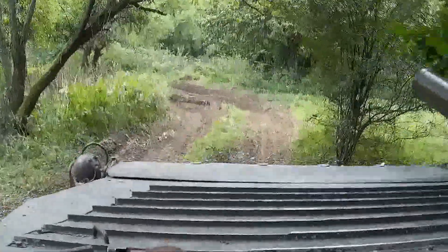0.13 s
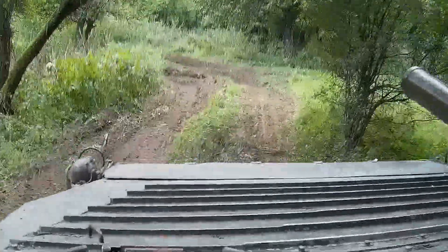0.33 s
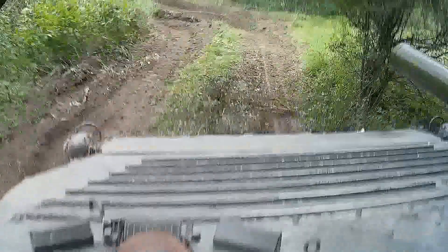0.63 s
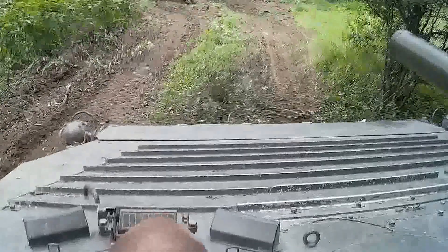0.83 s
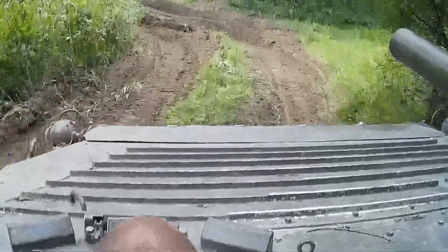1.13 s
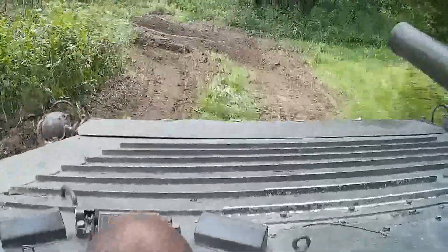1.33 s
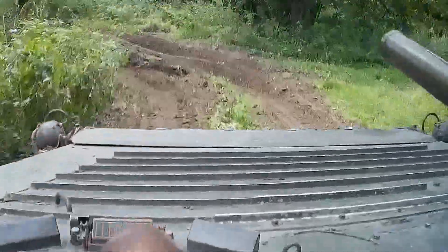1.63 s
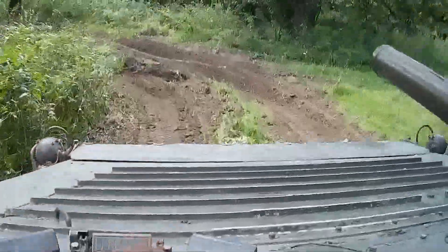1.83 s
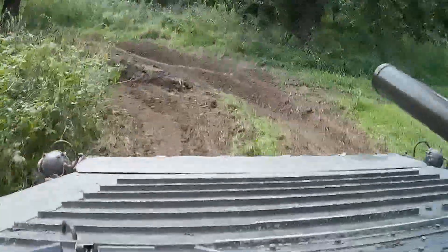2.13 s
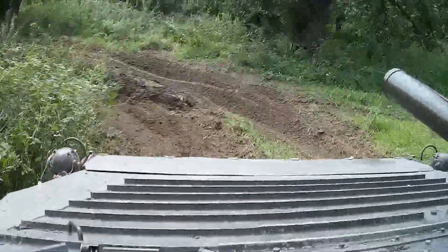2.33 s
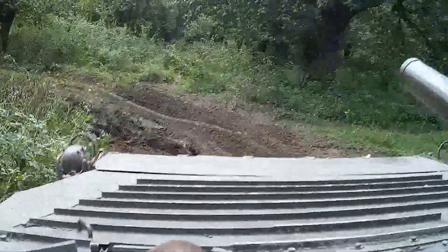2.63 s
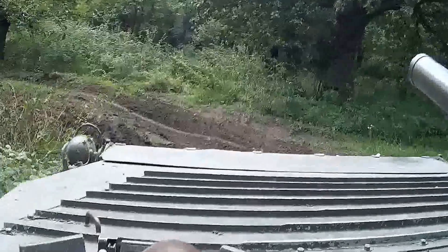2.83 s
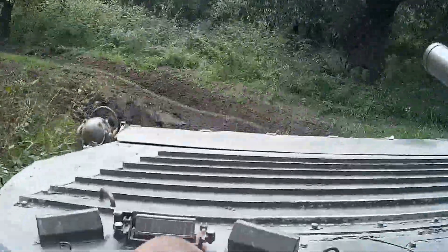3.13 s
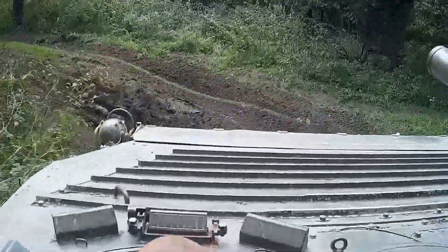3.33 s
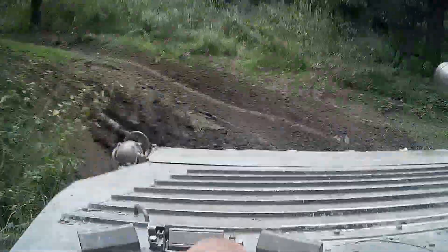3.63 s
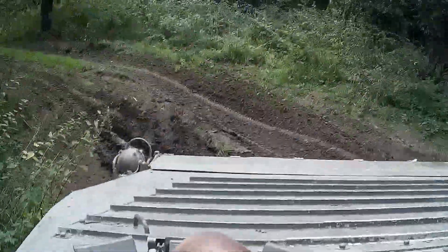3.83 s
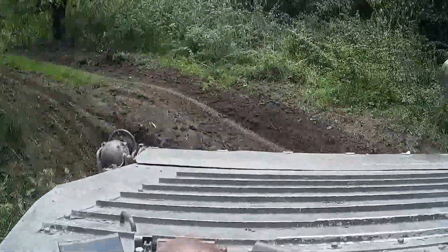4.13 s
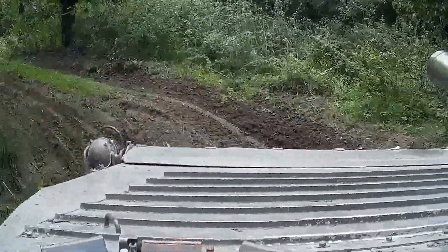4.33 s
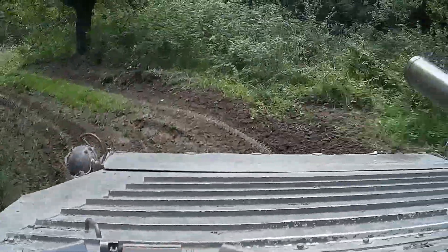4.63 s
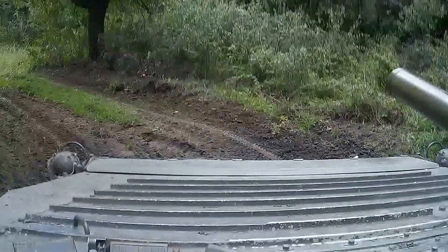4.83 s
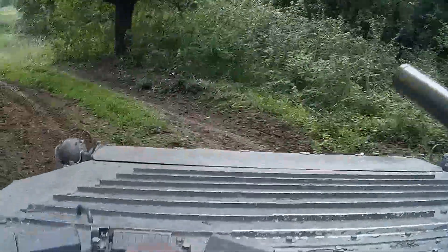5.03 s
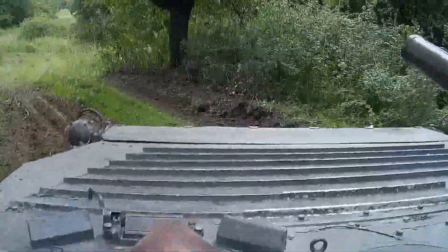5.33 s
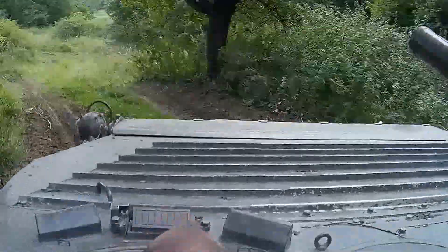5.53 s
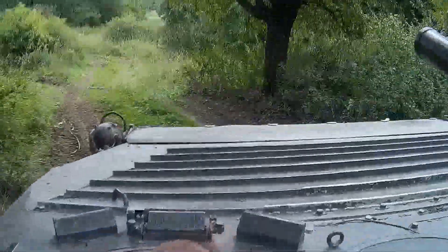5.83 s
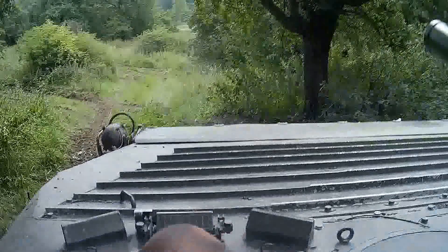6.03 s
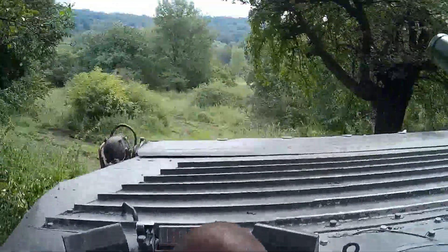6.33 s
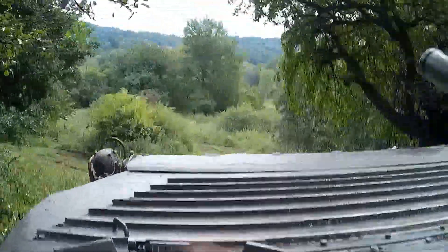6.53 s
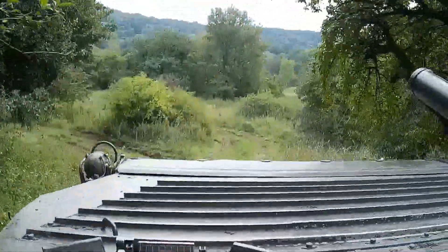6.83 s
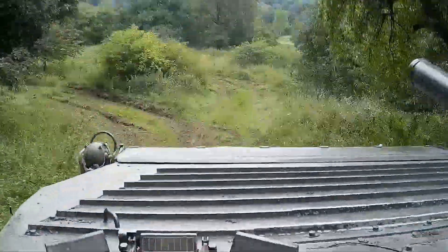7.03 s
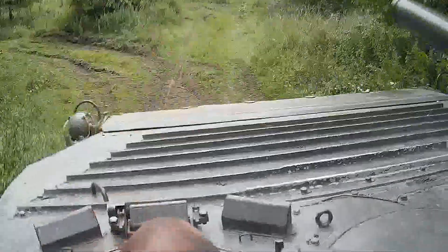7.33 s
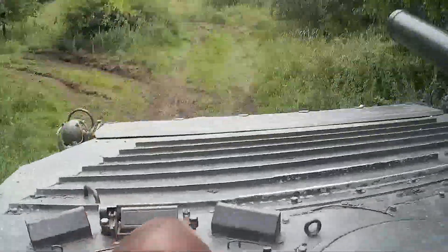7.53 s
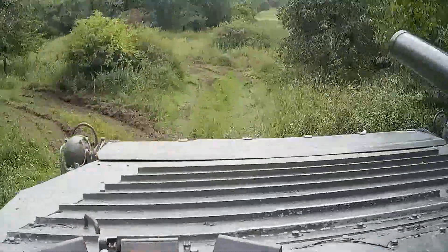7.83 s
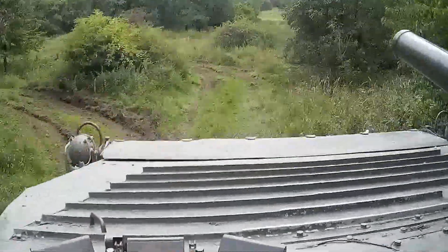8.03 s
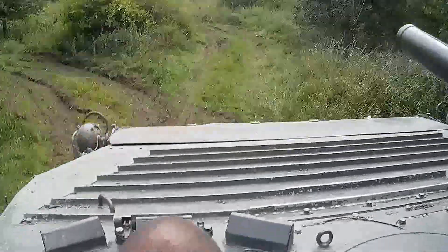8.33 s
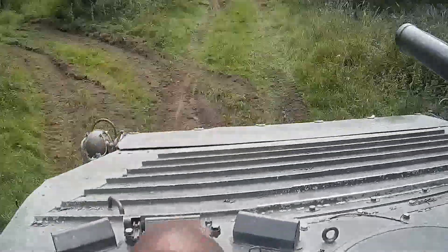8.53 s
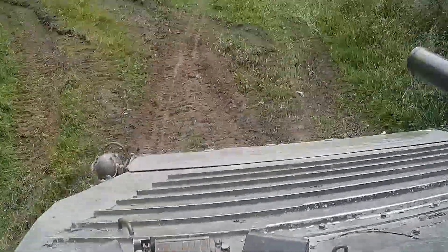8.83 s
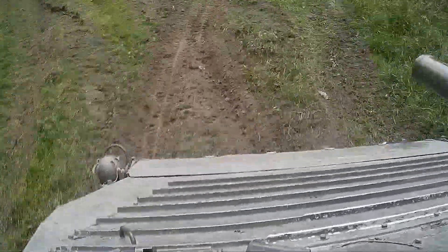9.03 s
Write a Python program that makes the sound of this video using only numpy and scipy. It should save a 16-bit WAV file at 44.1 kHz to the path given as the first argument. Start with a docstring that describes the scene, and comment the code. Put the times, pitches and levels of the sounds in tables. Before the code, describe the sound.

Close on top of a tracked armoured vehicle driving outdoors on a rutted track. A low diesel drone swells and eases over constant rumble and dense metallic clatter. A loose metal part clicks and rattles in bouts. Pulsing exhaust hiss strengthens in the middle while the engine pulls hard, then drops back. Thuds and low buffets mark bumps, heaviest near the end, when the level briefly ducks.

```python
"""Riding on a tracked armoured vehicle

Heard above the hull on a dirt track. The diesel, a stack of sines at engine orders, drones louder when it
pulls; shaped noise makes the exhaust jet, with a burst of hiss once a cycle, hardest under full throttle. Noise
rumble and dense taps on the hull grow with speed; ringing modes make a loose part rattle in bouts. Bumps and
wind buffets bring thuds, crushes of noise and low jolts of air; loud sounds make the recorder turn itself down
briefly."""
import sys
import numpy as np
from scipy import signal
from scipy.fft import rfft, irfft, next_fast_len
from scipy.io import wavfile
from scipy.ndimage import uniform_filter1d

SR = 44100
rng = np.random.default_rng(int(sys.argv[2]) if len(sys.argv) > 2 else 0)


def to_wav(sig):
    """Store sig (one row per channel, or 1-D mono) as 16-bit WAV at the path in sys.argv[1].

    Samples outside -1..1 are clipped; the rate is SR.
    """
    pcm = np.clip(np.atleast_2d(sig), -1, 1) * 32767
    pcm = np.round(pcm).astype(np.int16)
    wavfile.write(sys.argv[1], SR, pcm.T)  # frames by channels


N = 405279
CRUISE_CYCLES_PER_S = 31   # reference engine speed for all per-octave levels


def from_db(db):
    """Decibels to amplitude gain."""
    return 10 ** (np.asarray(db) / 20)


def rms_one(x):
    """Scale to unit rms."""
    return x / np.sqrt(np.mean(x ** 2) + 1e-20)


def in_time(rows):
    """Interpolate (time, value) rows linearly at every sample."""
    return np.interp(np.arange(N) / SR, *np.transpose(rows))


def at_hz(points, hz):
    """Read a (Hz, dB) spectrum on a log-frequency axis."""
    known_hz, db = np.transpose(points)
    return np.interp(np.log(np.maximum(hz, 1)), np.log(known_hz), db)


def drift(rate_hz):
    """Smooth random curve of rms 1: noise through two equal poles at rate_hz."""
    step = 40   # samples between computed points
    pole = np.exp(-2 * np.pi * rate_hz * step / SR)
    noise = rng.standard_normal(N // step + 2002)
    slow = signal.lfilter([1], [1, -2 * pole, pole * pole], noise)[2000:]   # drop the start-up
    return np.interp(np.arange(N) / step, np.arange(len(slow)), rms_one(slow))


def add(out, s, sound):
    """Mix a short sound in at time s."""
    start = int(np.clip(s * SR, 0, N - 1))
    out[start:start + len(sound)] += sound[:N - start]


# resonances of hull and engine deck: [centre_hz, width_hz, peak_db]
HULL_MODES = [(140.8, 9.9, 2.5), (706.7, 19.5, 7.5), (824.5, 108, 8.5), (1345, 62, 3.5), (1488, 31, 4),
              (1638, 109, 10), (1761, 108, 8), (1870, 120, -1), (2069, 86, 5), (2182, 146, 8),
              (2475, 197, 8), (2677, 235, 6.5), (2860, 50, -8), (2950, 60, 6), (3360, 145, -5.5),
              (3349, 210, 13), (3698, 197, 6.5), (4020, 48, 7.5), (4110, 150, -6), (5100, 270, 5.5),
              (5540, 260, 7.5), (5880, 203, 10.5), (6400, 160, 6), (7720, 490, 3), (8760, 130, 5.5)]


def through_hull(x, spectrum):
    """Minimum-phase filter: a source's smooth spectrum plus the hull resonances."""
    size = 2 * next_fast_len(N // 2 + SR // 4)
    hz = np.arange(size // 2 + 1) * SR / size
    db = at_hz(spectrum, hz)
    for centre_hz, width_hz, peak_db in HULL_MODES:
        distance = 2 * (hz - centre_hz) / width_hz
        db = db + peak_db * np.exp2(-np.minimum(distance ** 2, 20))
    cepstrum = irfft(np.log(from_db(db)))
    # folding the cepstrum onto positive time makes the filter causal
    response = np.exp(rfft(2 * cepstrum[:size // 2], size) - cepstrum[0])
    return irfft(rfft(x, size) * response)[:N]


# wheel rumble, relative spectrum: [freq_hz, density_db]
RUMBLE_SPECTRUM = [(12, -15), (25, -6), (42, -2), (60, 4), (85, -6.5), (130, -5), (170, -16), (260, -16.5),
                   (350, -25), (460, -33), (900, -55)]
# track clatter, relative spectrum: [freq_hz, density_db]
CLATTER_SPECTRUM = [(150, -4), (330, 3), (460, -3), (700, 0), (1050, -1), (1600, 3), (2200, -5.5),
                    (3200, -13), (5000, -14), (9000, -21), (16000, -65)]
# rms at cruising speed
RUMBLE_RMS_DB, RUMBLE_DB_PER_OCTAVE = -27, 3.5
CLATTER_RMS_DB, CLATTER_DB_PER_OCTAVE = -31.5, 7


def running_gear(speed, cycles, taps_per_s=450, size_db=3.0, wash=.2, throb=0.017,
                 lurch_db=1.0, uneven_db=0.78):
    """Wheels rumble on the tracks; links, pins and engine parts tap densely; both grow with speed."""
    octaves = np.log2(speed / CRUISE_CYCLES_PER_S)
    rolling = rng.standard_normal(N) * from_db(lurch_db * drift(4.5))
    rumble = rms_one(through_hull(rolling, RUMBLE_SPECTRUM))

    sizes = from_db(size_db * np.minimum(rng.exponential(1, N), 3.5))
    sizes = sizes * rng.choice([-1, 1], N)
    taps = sizes * (rng.random(N) < taps_per_s / SR) + wash * rng.standard_normal(N)
    taps = taps * (1 + throb * np.cos(2 * np.pi * cycles))
    taps = taps * from_db(uneven_db * drift(2.2))
    clatter = rms_one(through_hull(taps, CLATTER_SPECTRUM))

    rumble_gain = from_db(RUMBLE_RMS_DB + RUMBLE_DB_PER_OCTAVE * octaves)
    clatter_gain = from_db(CLATTER_RMS_DB + CLATTER_DB_PER_OCTAVE * octaves)
    return rumble_gain * rumble + clatter_gain * clatter


# jolts that buffet the microphone: [start_s, level_db (before boost_db), pitch_hz]
JOLT_EVENTS = [(0.638, -21, 32.2), (3.586, -17.5, 24.3), (5.945, -20, 30), (7.261, -4.5, 28.3),
               (8.302, -17, 40), (8.753, -12, 40), (8.782, -3.5, 31.7), (8.869, -4, 37.6),
               (8.953, -9, 25.5), (9.064, -5.5, 34)]


def jolts(swing=0.31, boost_db=4.0):
    """A shove of air on the microphone: one push, one pull, then it settles."""
    out, t = np.zeros(N), np.arange(SR // 5) / SR
    for start_s, level_db, pitch_hz in JOLT_EVENTS:
        push = t * np.exp(-t * pitch_hz / swing) * np.sin(2 * np.pi * pitch_hz * t)
        add(out, start_s, from_db(level_db + boost_db) * push / np.abs(push).max())
    return out


# suspension knocks, and from 8.3 s wind buffets: [start_s, crush_db (relative), thud_db (before its decay)]
KNOCK_EVENTS = [(2.907, -18, -19), (2.916, -13, -23), (2.936, -17, -33), (3.581, -10.5, -10.5),
                (3.655, -20, -26), (7.225, -9, -11), (8.321, -17.5, -37), (8.798, -8, -31.5),
                (8.889, -13, -32), (9.07, -12, -27)]
# crush of contacts, spectrum: [freq_hz, density_db]
KNOCK_SPECTRUM = [(100, 1), (200, -8), (300, -2.5), (450, -7), (750, -3), (1200, -2), (1700, -3),
                  (2500, -19.5), (5000, -7), (12000, -50)]


def knocks(rise_s=0.0011, fall_s=0.0038, tail_db=-17, tail_s=0.009, crush_boost_db=7,
           thud_hz=290, thud_decay_s=0.0047):
    """The suspension hits its stops, or wind buffets the hull: a dull hull thud, a noise crush, a short
    shudder."""
    crush, thuds, t = np.zeros(N), np.zeros(N), np.arange(SR // 5) / SR
    decay = np.exp(-t / fall_s) + from_db(tail_db) * np.exp(-t / tail_s)
    blow = (1 - np.exp(-t / rise_s)) * decay
    thud = np.exp(-t / thud_decay_s) * np.sin(2 * np.pi * thud_hz * t)
    for start_s, crush_db, thud_db in KNOCK_EVENTS:
        add(crush, start_s, from_db(crush_db + crush_boost_db) * blow)
        add(thuds, start_s, from_db(thud_db) * thud)
    return through_hull(crush * rng.standard_normal(N), KNOCK_SPECTRUM) + thuds


def strike(modes, extra_db, detune, length_s):
    """One blow on decaying modes, each with its own extra level; peak 1."""
    hz, db, t60_s = np.transpose(modes)[:, :, None]
    t = np.arange(int(length_s * SR)) / SR
    signs = (-1) ** np.arange(len(modes))[:, None]
    gains = signs * from_db(db + extra_db[:, None])
    decay = 1e-3 ** (t / t60_s)
    sound = np.sum(gains * decay * np.sin(2 * np.pi * hz * detune * t), axis=0)
    return sound / np.abs(sound).max()


# rough ground sets the loose part chattering: [start_s, end_s, typical_level_db (before boost_db)]
RATTLE_BOUTS = [(0.093, 0.33, -11), (3.054, 3.14, -9), (3.592, 3.68, -14), (4.256, 4.36, -14),
                (7.776, 7.94, -13.5), (8.129, 8.37, -15)]
CHATTER_PER_S, STRAY_PER_S, STRAY_DB = 44, 2, -19   # ticks in a rattle; lone ticks throughout
TICK_HZ, TICK_SPREAD_OCTAVES, TICK_SPREAD_DB = 5270, 0.29, 1


def light_ticks():
    """Uneven runs of ticks in each rattle, strays throughout: [start_s, level_db, centre_hz]."""
    runs = [(start, end, db, CHATTER_PER_S) for start, end, db in RATTLE_BOUTS]
    runs.append((0.0059, N / SR, STRAY_DB, STRAY_PER_S))
    ticks = []
    for start_s, end_s, db, per_s in runs:
        late = rng.random(size=64)
        loud, high = rng.standard_normal(size=64), rng.standard_normal(size=64)
        s = start_s + (np.arange(len(late)) + late) / per_s
        level_db = db + TICK_SPREAD_DB * loud
        centre_hz = TICK_HZ * 2 ** (TICK_SPREAD_OCTAVES * high)
        ticks += list(np.transpose([s, level_db, centre_hz])[s < end_s])
    return ticks


# hard clicks of the loose part: [start_s, level_db (before boost_db), centre_hz]
HARD_CLICKS = [(0.1294, -5, 6670), (0.166, -11, 6540), (0.2876, -7, 6400), (0.6466, -1, 7200),
               (0.675, -2, 4230), (1.2867, -12, 6000), (2.9463, -10.5, 5460), (3.1025, -11, 5350),
               (3.1196, -3.5, 4240), (3.5838, -7, 6600), (3.6484, -6.5, 5330), (3.6604, -7, 5290),
               (3.6703, 0, 5310), (3.707, -5, 4630), (4.2393, -7.5, 5350), (4.2452, -3, 4480),
               (4.3326, -7, 5330), (4.404, -5.5, 4530), (4.6988, -6.5, 5900), (4.9571, -4, 5800),
               (6.0097, -1.5, 5330), (6.3091, -2.5, 4370), (6.541, -7, 5850), (7.1908, -5.5, 5310),
               (7.2274, -3, 6600), (7.3098, 0, 5380), (7.424, -5, 4900), (7.816, -1.5, 5400),
               (7.866, -3.5, 5300), (7.9638, -11, 5290), (7.9776, -4.5, 5340), (8.059, -8, 5290),
               (8.1379, -8, 5310), (8.1879, -1.5, 5310), (8.201, -9, 5210), (8.336, -7, 5320),
               (8.4916, -3, 5270), (8.7102, -5, 5000), (8.808, -1, 5340), (9.074, -10.5, 6600)]
# modes of the loose part: [freq_hz, level_db (relative), t60_s]
LOOSE_PART_MODES = [(3855, 5.5, 0.0076), (4470, 3, 0.01), (5300, 1.5, 0.015), (6645, -3, 0.017),
                    (7070, -6, 0.012), (7770, 0.5, 0.0086), (8610, 0.5, 0.0046), (9550, -14, 0.011),
                    (10400, -43, 0.0062), (13000, -35, .004)]


def loose_part(focus_db=5, vary_db=2.0, bounce_db=-14, boost_db=2.5, crack_db=-7, crack_decay_s=0.0014,
               hardness=0.76, low_edge_hz=3400, high_edge_hz=9500):
    """Hard contact: a noise crack, the modes ringing most near centre_hz, then a weak rebound."""
    out, mode_hz = np.zeros(N), np.array(LOOSE_PART_MODES)[:, 0]
    for start_s, level_db, centre_hz in list(HARD_CLICKS) + light_ticks():
        chance = rng.standard_normal(len(LOOSE_PART_MODES) + 2)
        octaves_off = np.log2(mode_hz / centre_hz)
        colour_db = vary_db * chance[2:] + focus_db * np.exp(-(octaves_off / 0.14) ** 2)
        ring = strike(LOOSE_PART_MODES, colour_db, 1 + .012 * chance[0], length_s=.03)
        # harder contacts crack more against their ring
        crack = from_db(crack_db + hardness * level_db) * rng.standard_normal(len(ring))
        crack = crack * np.exp(-np.arange(len(ring)) / SR / crack_decay_s)
        click = from_db(level_db + boost_db) * (ring + crack)
        add(out, start_s, click)
        bounce_s = 0.0045 * np.exp(.5 * chance[1])
        add(out, start_s + bounce_s, from_db(bounce_db) * click)
    lowpass = signal.butter(4, high_edge_hz, fs=SR, output="sos")
    highpass = signal.butter(5, low_edge_hz, "high", fs=SR, output="sos")
    return signal.sosfilt(highpass, signal.sosfilt(lowpass, out + 1e-18))


# throttle as exhaust jet strength: [time_s, level_db (before gap_db)]
THROTTLE_CURVE = [(0, -36.5), (2.8, -38.5), (4.35, -38), (4.88, -28.5), (5.36, -36.5), (5.7, -25),
                  (5.86, -28), (6.05, -31.5), (6.39, -33), (6.52, -26.5), (6.85, -27.5), (7.22, -26),
                  (7.4, -38.5), (7.72, -34), (8.05, -40.5), (9.19, -39)]
# exhaust jet, relative spectrum: [freq_hz, density_db]
JET_SPECTRUM = [(400, -15.5), (1000, -13.5), (1600, -7), (2500, -10.5), (3500, 1), (4500, -5), (5600, -1),
                (7000, -4), (9000, -7.5), (10200, -18.5), (12000, -20.5), (16000, -35)]
# burst above the throttle curve at light throttle; extra dB per dB of throttle
LIGHT_THROTTLE_DB, BURST_DB, BURST_GROWTH = -38.5, 8.5, 0.24


def exhaust_hiss(cycles, width_cycles=0.092, second_db=-11, second_lag_cycles=0.67, grit_db=3.0, gap_db=1.0):
    """One cylinder blows off hard once a cycle, its neighbour faintly; the jet hisses on between."""
    jet_db = in_time(THROTTLE_CURVE)
    peak_db = jet_db + BURST_DB + BURST_GROWTH * (jet_db - LIGHT_THROTTLE_DB)

    def burst(lag_cycles):
        """A puff each cycle that opens faster than it dies."""
        offset = (cycles - lag_cycles + .5) % 1 - .5
        width = width_cycles * np.where(offset < 0, .75, 1.3)
        return np.exp(-.5 * (offset / width) ** 2)

    strength = from_db(1.1 * drift(25))
    main_power = (strength * burst(-0.0085)) ** 2
    second_power = (from_db(second_db) * burst(second_lag_cycles)) ** 2
    burst_power = from_db(peak_db) ** 2 * (main_power + second_power)
    envelope = np.sqrt(from_db(jet_db + gap_db) ** 2 + burst_power)
    turbulence = rms_one(rng.standard_normal(N) * from_db(grit_db * drift(290)))
    hiss = rms_one(through_hull(envelope * turbulence, JET_SPECTRUM))
    return hiss * np.sqrt(np.mean(envelope ** 2))


# engine pulls: [start_s, end_s, load (0-1)]
PULL_EVENTS = [(-0.05, 0.563, 0.8), (1.738, 1.917, 0.5), (2.743, 3.506, 0.87), (4.17, 7.26, 0.92)]
LOAD_ATTACK_S, LOAD_RELEASE_S = 0.11, 0.19


def engine_load():
    """Each pull builds up, holds and lets go; 0 when running free."""
    t = np.arange(N) / SR
    total = np.zeros(N)
    for start_s, end_s, load in PULL_EVENTS:
        rise = (t - start_s) / LOAD_ATTACK_S
        fall = 1 - (t - end_s) / LOAD_RELEASE_S
        total += load * np.clip(np.minimum(rise, fall), 0, 1)
    return total


# exhaust pipe response: [freq_hz, gain_db]
PIPE_RESPONSE = [(80, -14), (112, 7.5), (140, -6), (165, -5), (183, 0.5), (230, -11), (280, -14),
                 (350, -23), (500, -56), (800, -39)]
# levels at load 1 and cruising speed; sinks apply in full at load 0
FIRING_RMS_DB, FIRING_SINK_DB, FIRING_DB_PER_OCTAVE = -24.5, 8.5, -0.5
OVERTONES_DB, OVERTONES_SINK_DB, OVERTONES_DB_PER_OCTAVE = -32, 14.5, 10.5
ODD_ORDERS_DB = -7


def exhaust_note(speed, cycles, waver_db=1.8, unsteady_db=1.5, lead_cycles=0.4083):
    """Firing pulses give even orders, one stronger cylinder odd ones; load swells, the pipe colours."""
    slack = 1 - engine_load()
    octaves = np.log2(speed / CRUISE_CYCLES_PER_S)
    phase_cycles = cycles + lead_cycles + .003 * drift(8)

    def engine_order(k, rms_db):
        """A sine at k times the cycle rate."""
        return -np.sqrt(2) * from_db(rms_db) * np.cos(2 * np.pi * k * phase_cycles)

    firing_db = FIRING_RMS_DB - FIRING_SINK_DB * slack + FIRING_DB_PER_OCTAVE * octaves
    firing = engine_order(2, firing_db + waver_db * drift(12.0))
    overtones = np.zeros(N)
    for k in [*range(3, 15), 16, 18, 20]:
        order_db = at_hz(PIPE_RESPONSE, k * speed) + ODD_ORDERS_DB * (k % 2)
        overtones += engine_order(k, order_db + unsteady_db * drift(4.3))
    overtones_db = OVERTONES_DB - OVERTONES_SINK_DB * slack + OVERTONES_DB_PER_OCTAVE * octaves
    return firing + from_db(overtones_db) * overtones


# engine speed; the firing note lies at twice this rate: [time_s, speed_cycles_per_s]
ENGINE_SPEED = [(0.0, 28.11), (0.51, 27.77), (1.19, 35.54), (1.71, 30.41), (2.63, 31.75), (2.93, 27.5),
                (3.32, 27.18), (3.79, 31.9), (4.41, 30.19), (4.82, 30.42), (5.06, 34.16), (5.32, 35.56),
                (5.74, 32.39), (5.98, 34.62), (6.31, 35.33), (6.73, 26.09), (7.16, 24.86), (7.48, 31.38),
                (7.74, 32.51), (8.52, 27.56), (9.19, 31.96)]


def scene():
    """Engine speed times the drone, the hiss and the throb of the clatter."""
    speed = in_time(ENGINE_SPEED)
    cycles = np.cumsum(speed) / SR
    vehicle = running_gear(speed, cycles) + jolts() + knocks() + loose_part()
    engine = exhaust_hiss(cycles) + exhaust_note(speed, cycles)
    return (vehicle + engine)[None]


LIMIT_DB, DETECTOR_S, RECOVERY_DB_PER_S = -7, 0.0062, 22
TREBLE_EMPHASIS = 2.53   # reacts to clicks and hiss as well as to jolts


def gain_control(x):
    """Sensed level over the limit turns the gain down within milliseconds; it then creeps back."""
    window = max(int(DETECTOR_S * SR), 1)
    sensed = x + TREBLE_EMPHASIS * np.diff(x, prepend=0)
    level_db = 10 * np.log10(np.maximum(uniform_filter1d(sensed ** 2, window), 1e-12))
    excess_db = np.maximum(level_db - LIMIT_DB, 0)
    # a running maximum on a rising ramp holds each peak and lets it fall at the recovery rate
    recovery_db = RECOVERY_DB_PER_S * np.arange(N) / SR
    cut_db = np.maximum.accumulate(excess_db + recovery_db, axis=-1) - recovery_db
    smooth_cut_db = signal.lfilter([1 / window], [1, 1 / window - 1], cut_db)
    return x * from_db(-smooth_cut_db)


def record(dry, ceiling=0.77, cutoff_hz=15800):
    """Gain control, then soft rounding of the highest peaks, then a steep treble cut."""
    x = gain_control(dry)
    rounded = x / (1 + (x / ceiling) ** 6) ** (1 / 6)
    treble_cut = signal.ellip(10, .1, 90, cutoff_hz, fs=SR, output="sos")
    return signal.sosfilt(treble_cut, rounded)


dry = scene()
out = record(dry)
to_wav(out)
```